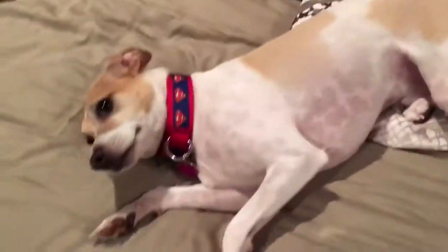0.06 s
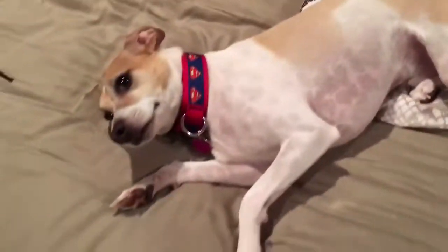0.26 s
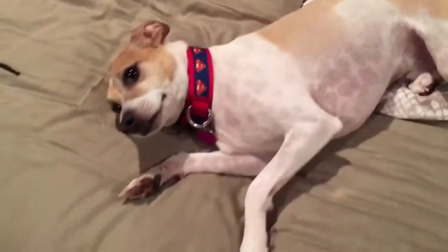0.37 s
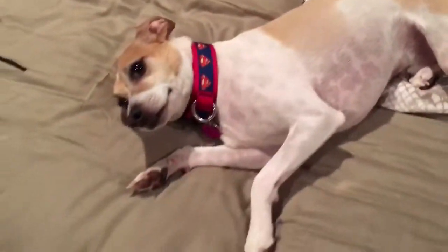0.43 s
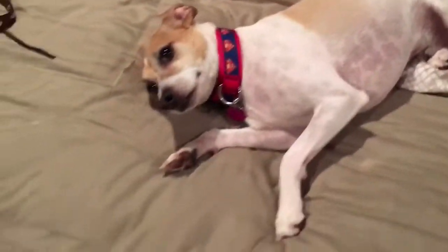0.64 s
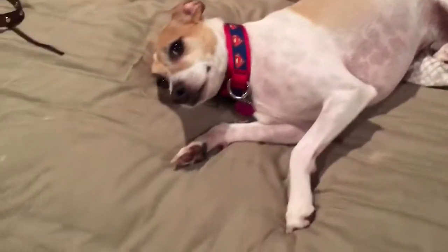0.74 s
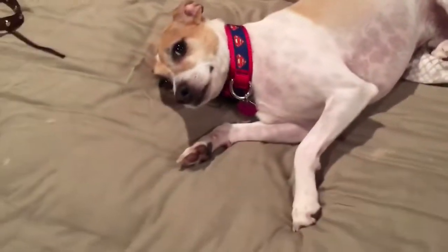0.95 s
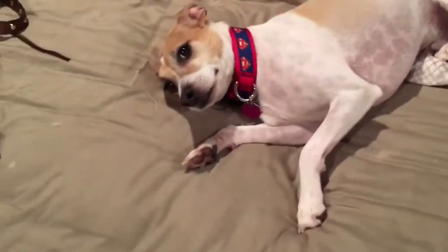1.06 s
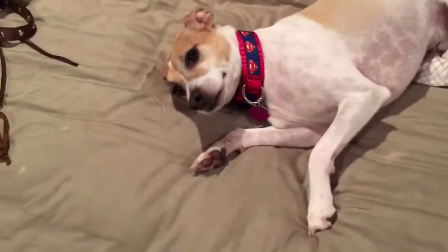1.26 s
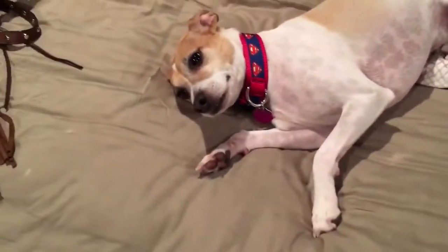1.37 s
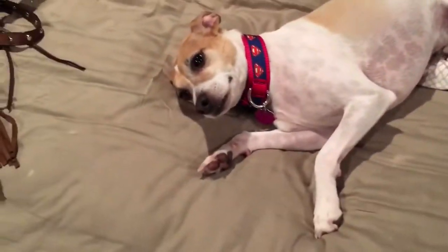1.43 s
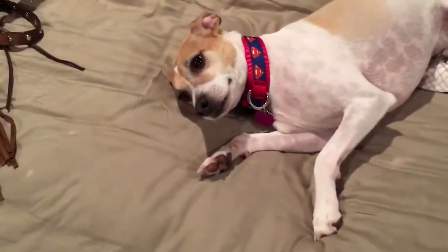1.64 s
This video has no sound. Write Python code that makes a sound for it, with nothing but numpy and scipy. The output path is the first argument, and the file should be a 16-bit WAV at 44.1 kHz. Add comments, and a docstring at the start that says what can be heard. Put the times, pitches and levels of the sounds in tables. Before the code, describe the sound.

Four dull, regular thumps sound as a dog wags its tail against a bed. The soft, low hits are near the microphone and die away quickly, over the faint hum and hiss of a quiet bedroom.

```python
"""Tail thumps on a bed

A dog lying on a bed thumps its tail on the bedspread four times, in a quiet bedroom.
Each impact crushes the cloth, squeezes out a pulse of air and excites the damped modes of padding,
frame and mattress. The room reverberates briefly over a low hum, a deep drone and a faint hiss."""
import sys
import numpy as np
from scipy import signal
from scipy.fft import rfft, irfft
from scipy.io import wavfile
from scipy.ndimage import uniform_filter1d

SR = 44100
rng = np.random.default_rng(int(sys.argv[2]) if len(sys.argv) > 2 else 0)


def persist_wave(psi):
    """Save psi, clipped to +-1, as 16-bit WAV."""
    counts = np.round(np.clip(psi, -1, 1) * 32767).astype(np.int16)
    wavfile.write(sys.argv[1], SR, np.atleast_2d(counts).T)


N = 74970

# blows of the tail, with relative levels:
# t/s, padding/dB, frame/dB, bounce/dB, slap/dB, slap top/Hz, cloth/dB, snap/dB, snap/Hz, echo/dB
TAIL_BLOWS = [(0.2462, 3.5, 0, 4.5, 0, 476, 1.5, -5, 1350, -7.5),
              (0.5942, 3.5, 1, -2, -2.5, 636, 2, 2, 1196, -6),
              (0.9708, 2, -4, 3, -0.5, 1110, 0, -3, 1850, -6),
              (1.3430, 3.5, 2.5, 2.5, -1.5, 1140, 1.5, -13.5, 1990, -7)]
# spectrum of the room tone: f/Hz, relative density/dB
ROOM_TONE_SPECTRUM = [(25, -20), (50, -2.5), (75, -9.5), (107, -11.5), (160, -7), (210, -10), (330, -13),
                      (420, -21.5), (600, -24), (1200, -29.5), (3000, -33.5), (9000, -35.5), (10000, -45)]
# partials of an appliance's hum: f/Hz, median rms level/dB
HUM_PARTIALS = [(150.7, -79.5), (237, -78), (335, -79.5)]
# envelope of the drone: t/s, rms level/dB
DRONE_ENVELOPE = [(0, -56), (.1, -87), (.19, -74.5), (.4, -64), (.47, -83), (.53, -64.5), (.72, -62),
                  (.77, -90), (.9, -71.5), (1.14, -68), (1.29, -59), (1.4, -55.5), (1.52, -81.5),
                  (1.57, -75.5), (1.7, -86)]
# spectrum of crushed cloth: f/Hz, relative density/dB
CLOTH_SPECTRUM = [(150, 2.5), (500, -0.5), (1200, 1.5), (2200, -6), (3600, -8), (5500, -13.5), (8000, -16),
                  (10000, -21.5)]
# modes of the padding, the frame and the mattress: f/Hz, relative level/dB, T60/s
PADDING_MODES = [(112.7, -5, 0.078), (145.8, -11, .04)]
FRAME_MODES = [(204, -28, 0.22), (240.7, -19.5, 0.068), (271, -18.5, 0.17), (346.6, -25.5, 0.27),
               (396, -30.5, 0.31), (460, -41, 0.075), (570, -23, 0.057)]
MATTRESS_MODES = [(51.9, 7.5, 0.62), (108.6, 1.5, .3)]
# reverberation of the bedroom: f/Hz, relative level/dB, T60/s
ROOM_DECAY = [(150, -4, 0.1), (420, 5.5, 0.18), (1050, -1, 0.29), (2600, 0, .22), (5060, 5.5, 0.57),
              (9600, 0.5, 0.19)]

TIME = np.arange(N) / SR
FREQS = np.arange(N // 2 + 1) * SR / N + 1e-9


def undb(db):
    """Amplitude ratio of a level in decibels."""
    return 10 ** (np.asarray(db) / 20)


def on_log_axis(hz, table, column=1):
    """Interpolation of a table column over log frequency."""
    table = np.array(table, float)
    return np.interp(np.log(hz), np.log(table[:, 0]), table[:, column])


def noise(spectrum_db):
    """Spectral shaping of white noise, scaled to unit rms."""
    shaped = irfft(rfft(rng.standard_normal(N)) * undb(spectrum_db), N)
    return shaped / shaped.std()


def wander(rate_hz=8.01):
    """Smoothing of random steps into a slow fluctuation of unit spread."""
    hold = int(SR / rate_hz)
    steps = np.repeat(rng.standard_normal(N // hold + 1), hold)
    smooth = uniform_filter1d(uniform_filter1d(steps, hold), hold)[:N]
    return smooth / smooth.std()


def tone(hz, rms_db):
    """Random phase modulation makes a sinusoid waver."""
    return undb(rms_db) * np.sqrt(2) * np.sin(2 * np.pi * hz * TIME + wander())


def ring(age, modes):
    """Superposition of damped modes, pushed downward at age 0."""
    age = np.maximum(age, 0)
    return -sum(undb(db) * np.sin(2 * np.pi * hz * age) * np.exp(-np.log(1000) * age / t60)
                for hz, db, t60 in modes)


def room_tone():
    """Stationary noise, strongest in the bass, with a faint hiss above."""
    return undb(-66) * noise(on_log_axis(FREQS, ROOM_TONE_SPECTRUM))


def hum(waver_db=4):
    """Random amplitude modulation makes each partial of an appliance's hum swell and dip."""
    return sum(tone(hz, db + waver_db * wander()) for hz, db in HUM_PARTIALS)


def drone(hz=75.4):
    """Amplitude modulation: one deep tone swells and fades."""
    return tone(hz, np.interp(TIME, *np.array(DRONE_ENVELOPE).T))


def rustle(peak_s=0.085, width_s=0.065, centre_hz=1350, half_band_octaves=0.58):
    """Band-limited noise under a Gaussian envelope: the bedding stirs softly."""
    band_db = -10 * np.log10(1 + (np.log2(FREQS / centre_hz) / half_band_octaves) ** 4)
    swell = np.exp(-((TIME - peak_s) / width_s) ** 2 / 2)
    return undb(-72.5) * swell * noise(band_db)


def cloth_crush(age, lead_s=0.00955, rise_s=0.003, fall_s=0.0062):
    """Compression of the bedspread gives a noise burst that starts just ahead of the blow."""
    press = np.clip((age + lead_s) / rise_s, 0, 1) * np.exp(-np.maximum(age, 0) / fall_s)
    return undb(-57.5) * press * noise(on_log_axis(FREQS, CLOTH_SPECTRUM))


def air_slap(age, top_hz, low_hz=220, edge_db_per_octave=51):
    """Air displaced by the tail radiates one pulse; a flatter landing has a higher top_hz."""
    high_pass = FREQS / np.hypot(FREQS, low_hz)
    low_pass = 1 / np.hypot(1, undb(edge_db_per_octave * np.log2(FREQS / top_hz)))
    delay = np.exp(2j * np.pi * FREQS * age[0])  # centres the pulse on age 0
    return undb(-4) * irfft(high_pass * low_pass * delay, N)


def cloth_snap(age, hz, width_cycles=0.57):
    """Sudden tension: the cloth snaps taut on contact and emits a Gaussian wave packet."""
    return undb(-42) * np.sin(2 * np.pi * hz * age) * np.exp(-(age * hz / width_cycles) ** 2 / 2)


def thud(age, padding_db, frame_db, push_s=0.0017, scatter_db=3):
    """Impact excitation of padding and frame; the finite contact time weakens the higher modes."""
    push_time = np.arange(-SR // 100, SR // 100 + 1) / SR
    push = np.exp(-2 * (push_time / (push_s / 2)) ** 2)
    # each spot on the bed rings the frame a little differently
    frame_modes = [(hz, db + scatter_db * rng.standard_normal(), t60) for hz, db, t60 in FRAME_MODES]
    ringing = undb(padding_db) * ring(age, PADDING_MODES) + undb(frame_db) * ring(age, frame_modes)
    return undb(-27) * signal.fftconvolve(ringing, push / push.sum(), mode="same")


def reverberation(sound, delay_s=0.003):
    """Convolution with a diffuse field that decays exponentially, each octave at its own rate."""
    age = np.maximum(TIME - delay_s, 0)
    white = rfft(rng.standard_normal(N))
    response = 0
    for hz in 100 * 2. ** np.arange(8):
        band = irfft(white * np.maximum(1 - abs(np.log2(FREQS / hz)), 0), N)
        decay_s = on_log_axis(hz, ROOM_DECAY, column=2) / np.log(1000)
        gain = undb(on_log_axis(hz, ROOM_DECAY)) / np.sqrt(decay_s * SR / 2)
        response = response + gain * band * np.exp(-age / decay_s)
    return signal.fftconvolve(sound, response * (TIME > delay_s))[:N]


def bounce(age, lag_s=0.0075, rise_s=0.0095, free_s=0.069, stop_s=0.0051, relax_s=0.013):
    """Damped oscillation: the mattress rebounds, its pitch sinks as it relaxes, the padding stops it."""
    age = np.maximum(age - lag_s, 0)
    swing = np.minimum(age / rise_s, 1) * np.exp(-np.maximum(age - free_s, 0) / stop_s)
    advance_s = 0.22 * relax_s * (1 - np.exp(-age / relax_s))  # starts 22 % sharp
    return undb(-50.5) * swing * ring(age + advance_s, MATTRESS_MODES)


def scene():
    """Superposition of the background and four blows; only the surface sounds reverberate."""
    out = room_tone() + hum() + drone() + rustle()
    for (start, padding_db, frame_db, bounce_db, slap_db, slap_hz,
         cloth_db, snap_db, snap_hz, echo_db) in TAIL_BLOWS:
        age = TIME - start
        contact_age = age + 0.00078  # contact comes just before the padding gives
        surface = (undb(cloth_db) * cloth_crush(contact_age)
                   + undb(slap_db) * air_slap(contact_age, slap_hz)
                   + undb(snap_db) * cloth_snap(contact_age, snap_hz))
        bed = thud(age, padding_db, frame_db) + undb(bounce_db) * bounce(age)
        out = out + surface + bed + undb(echo_db) * reverberation(surface)
    return out[None]


def record(dry):
    """Band limiting: the microphone drops the deepest bass and the highest treble."""
    low_cut = signal.butter(2, 33.5, "high", fs=SR, output="sos")
    high_cut = signal.ellip(8, .2, 60, 10000, fs=SR, output="sos")
    return signal.sosfilt(high_cut, signal.sosfiltfilt(low_cut, dry))


dry = scene()
out = record(dry)
persist_wave(out)
```